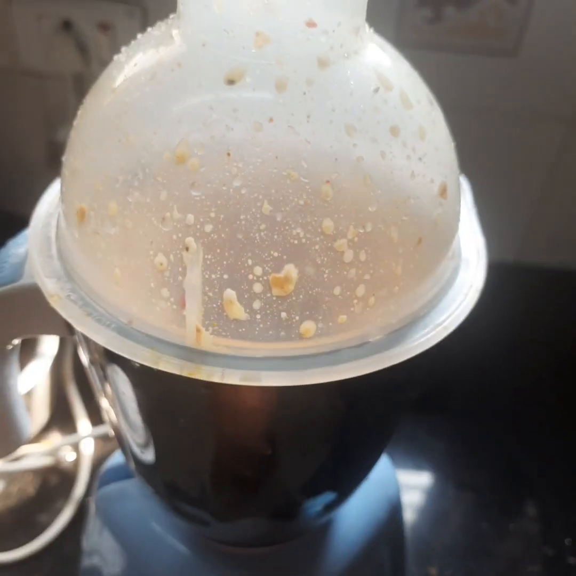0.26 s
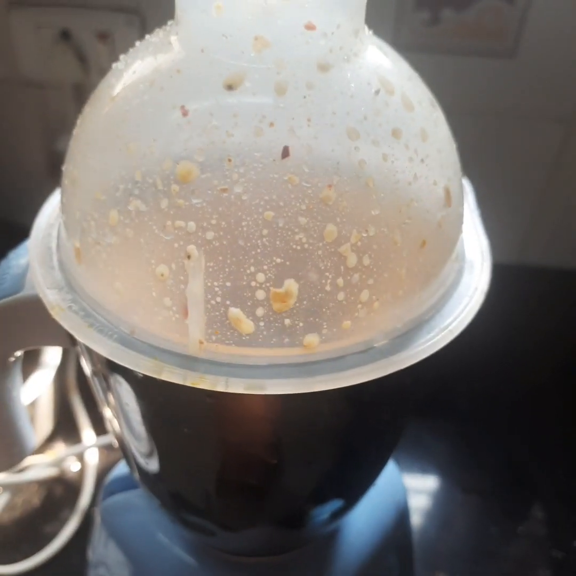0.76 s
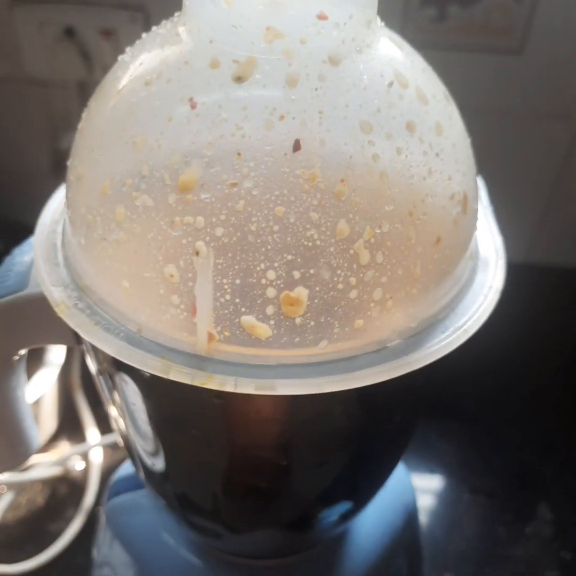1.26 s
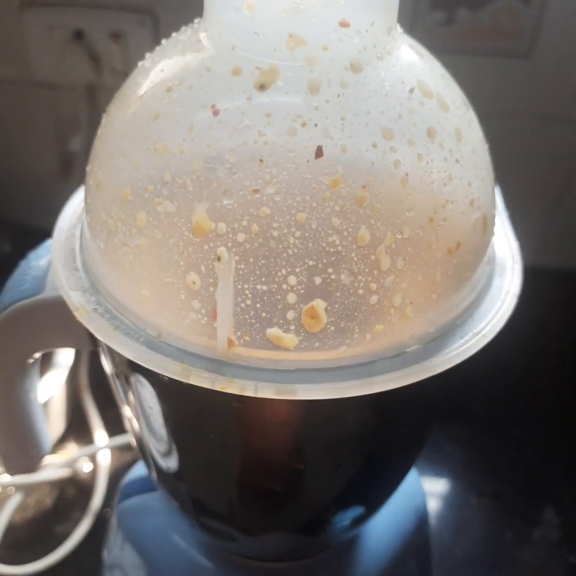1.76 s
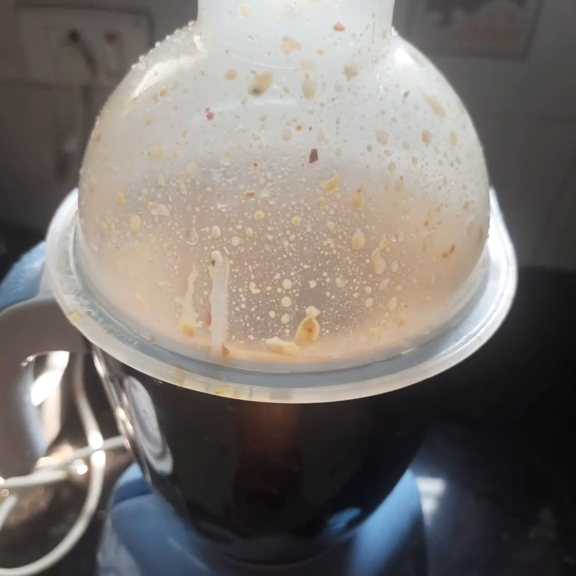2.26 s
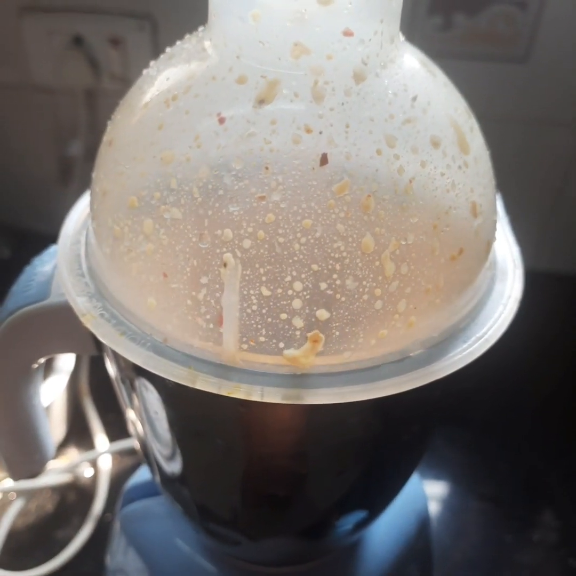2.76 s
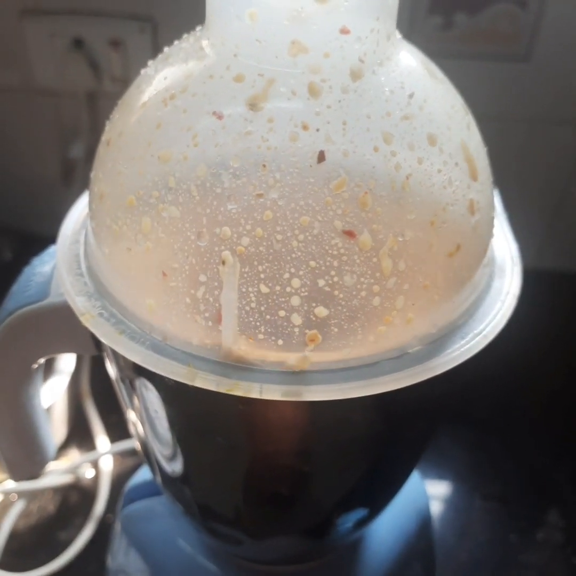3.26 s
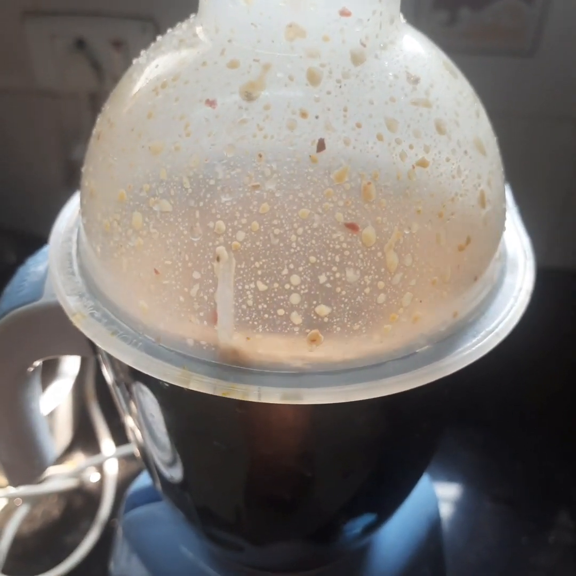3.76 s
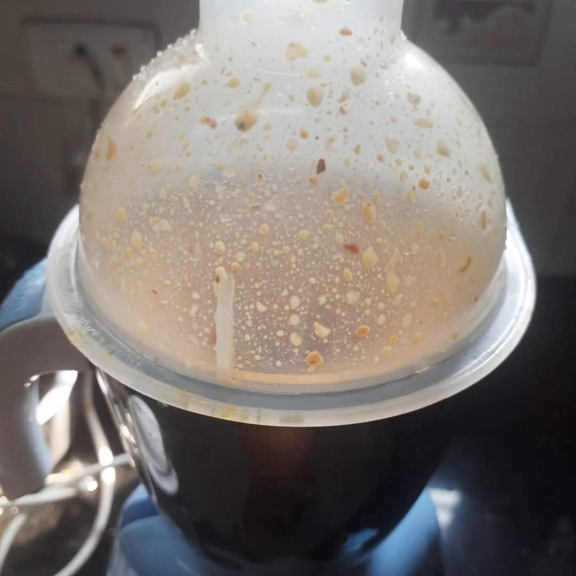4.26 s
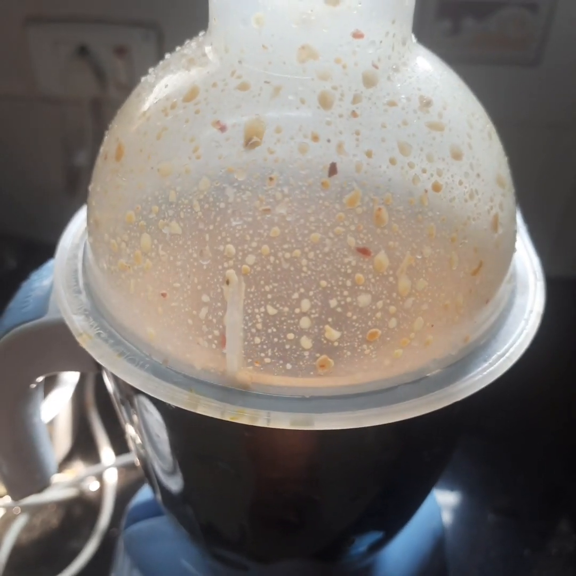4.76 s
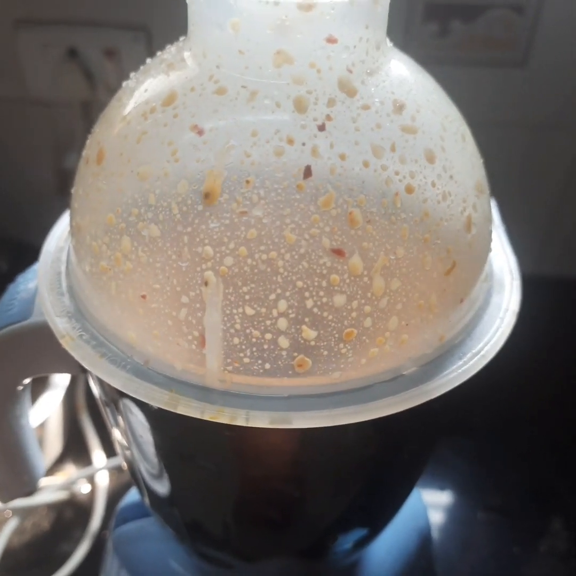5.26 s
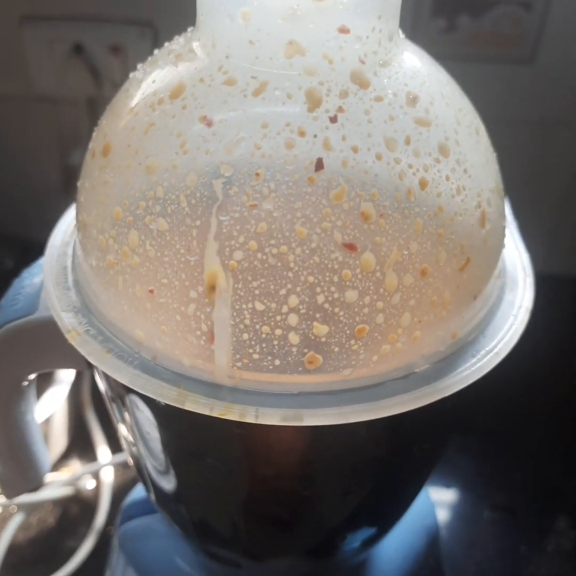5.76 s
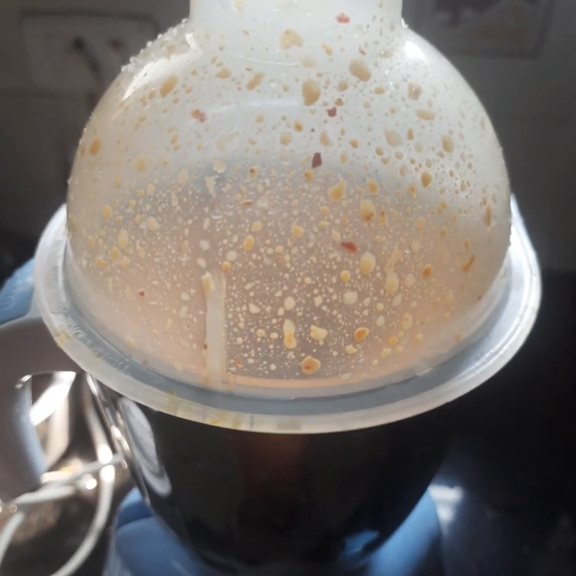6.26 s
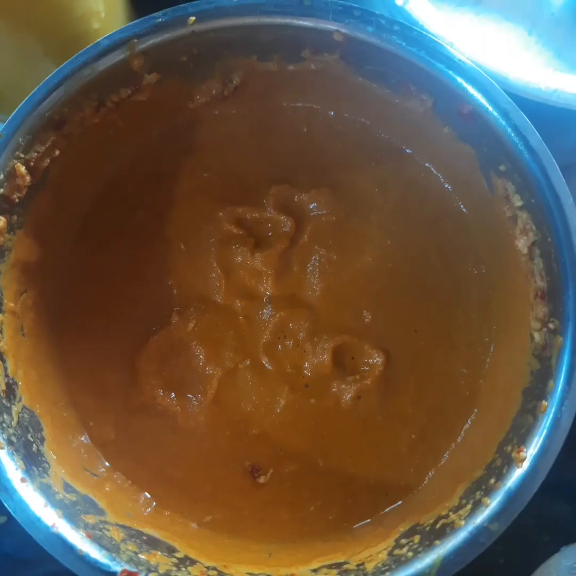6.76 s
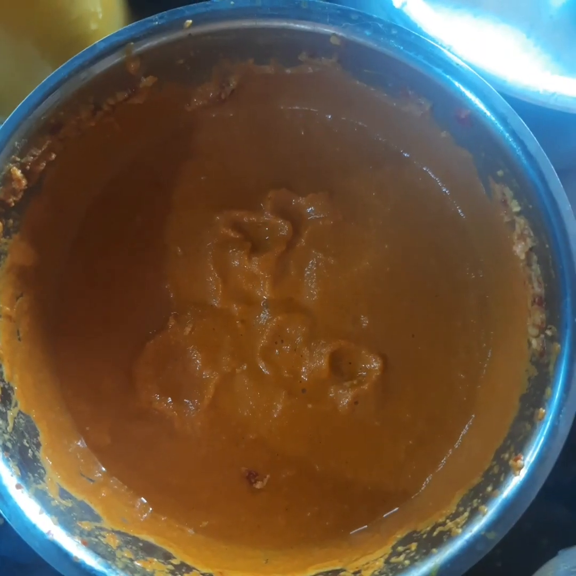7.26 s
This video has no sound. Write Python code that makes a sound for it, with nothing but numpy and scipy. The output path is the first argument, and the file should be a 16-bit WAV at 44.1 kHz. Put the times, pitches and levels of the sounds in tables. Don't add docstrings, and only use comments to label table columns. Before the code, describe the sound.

Close, steady electric grinder drone with metallic ringing, roaring fan and fizzing spray, suddenly replaced after a tiny silence by faint kitchen hum.

```python
import sys
import numpy as np
from scipy import signal
from scipy.io import wavfile
from scipy.ndimage import uniform_filter1d

SR = 44100
rng = np.random.default_rng(int(sys.argv[2]) if len(sys.argv) > 2 else 0)


def linear_from_db(decibels):
    return 10 ** (np.asarray(decibels, float) / 20)


def to_wav(s):
    ch = np.atleast_2d(s).T
    pcm = np.round(np.clip(ch, -1, 1) * 32767)
    wavfile.write(sys.argv[1], SR, pcm.astype(np.int16))


N = 331191
T = np.arange(N) / SR

# time in seconds, turns per second in Hz, hum level in dB,
# hum left minus right in dB.
SHAFT_RUN = [(0.0, 241.2, -15.5, -1), (0.07, 239.3, -16, -3.5), (0.45, 240.7, -16.5, -4),
             (0.54, 241.6, -16, -3), (1.84, 238.8, -16, -4.5), (2.19, 239.1, -16.5, -4.5),
             (3.16, 239.5, -16.5, -4.5), (3.34, 237.4, -17.5, -5), (4.18, 238.2, -17, -4.5),
             (4.4, 236.8, -18.5, -5.5), (4.61, 237.3, -16.5, -4.0), (4.96, 237.7, -17.5, -5.5),
             (5.09, 237.2, -17, -4.5), (6.63, 234.9, -17, -4.5), (6.67, 238, -17, -4.5)]


def shaft_angle():
    speed_hz = column(SHAFT_RUN, count=1) + 0.38 * drift(top_hz=24.84)
    return 2 * np.pi * np.cumsum(speed_hz) / SR


# multiple of the shaft speed, start phase in radians,
# right minus left in dB, left lead in radians.
OVERTONE_PORTS = [(2, 0.31, -5.5, 1.08), (3, 0.81, -6, 1.1), (4, 1, -4, 2.8)]
# best speed
# in Hz, level in dB, dB lost per Hz away from it, waver in dB, share of the jar's tilt taken (no unit).
OVERTONE_MOUNTS = [(232.2, -34, 0.43, 2.73, -0.48), (239.2, -36.5, 1.8, 0.4, 1.1),
                   (237., -32.5, 0.6, 1.3, -.2)]
# time in seconds, tilt in dB,
# half length in seconds.
PASTE_LURCHES = [(0.3, 3, 0.098), (0.67, -3, 0.18), (0.97, 5.5, 0.071), (1.15, -5, 0.044),
                 (1.65, 2.5, 0.17), (1.9, 2.5, 0.065), (2.4, 2, .12), (2.63, -2.5, 0.062), (3.0, 3.5, 0.19),
                 (3.52, 0, 0.071), (3.8, 4, 0.081), (4.5, -1, 0.093), (4.88, 6, .08), (5.05, 0, .06),
                 (5.4, 1.5, 0.11), (5.62, -7, 0.071), (5.92, 0, .07)]
# multiple of the shaft speed, left level in dB, right level in dB,
# left lead in radians.
FAINT_OVERTONES = [(5, -50, -48, -.9), (11, -54, -49, -.7), (12, -53, -49, -.8)]


def hum(angle):
    hum_lead = np.interp(T, [0, 4.5], [0.3, 0.02])
    level = linear_from_db(column(SHAFT_RUN, count=2) + 0.35 * drift(top_hz=30.2) - 0.4)
    turning = np.sqrt(2) * level * np.exp(1j * angle)
    out = ports(turning, column(SHAFT_RUN, count=3), hum_lead)

    tilt_db = swells(PASTE_LURCHES)
    for port, mount in zip(OVERTONE_PORTS, OVERTONE_MOUNTS):
        order, start, right_db, lead = port
        best_hz, top_db, loss_db, waver_db, share = mount
        phase = order * angle + start + 0.34 * drift(top_hz=8.6)
        off_hz = abs(column(SHAFT_RUN, count=1) - best_hz)
        suited_db = top_db - loss_db * off_hz + waver_db * drift(top_hz=5.0)
        left = np.sqrt(2) * linear_from_db(suited_db + share * tilt_db + 1.3 * drift(top_hz=33.97))
        right = left * linear_from_db(right_db + 1.8 * drift(top_hz=6.0))
        out[0] += left * np.cos(phase)
        out[1] += right * np.cos(phase - lead + 0.22 * drift(top_hz=6.5))

    for order, left_db, right_db, lead in FAINT_OVERTONES:
        phase = order * angle + 1.7 * drift(top_hz=12.0)
        z = np.sqrt(2) * linear_from_db(1.7 * drift(top_hz=6.7)) * np.exp(1j * phase)
        out += [linear_from_db(left_db) * (z * np.exp(1j * lead)).real, linear_from_db(right_db) * z.real]
    return out


def churn_lift_db():
    lumpy_db, settling_s, surge_db = 5, 0.12, 0.41
    return lumpy_db * np.exp(-T / settling_s) + surge_db * drift(top_hz=10.0)


# pitch in Hz, width in Hz, level in dB,
# left minus right in dB, left lead in radians.
JAR_TONES = [(397, 150, -48, 6.5, 1.56), (583, 69, -51, 7, 0.2), (939, 75, -40, -3, 1.5),
             (1057, 52, -46.5, 0, -0.5), (1235, 170, -39.5, -3, -2.5), (1355, 140, -43.5, -1, -1),
             (1567, 80, -42, -0.5, -2.5), (1778, 100, -45.5, 7, 0), (1934, 100, -42, -1.5, -2.0),
             (2035, 29.7, -44, 5, -1.5), (2120, 55, -39, -3, -2.5), (2253, 24, -46, -5, 4.5),
             (2395, 43, -44.5, -4, 6.5), (2584, 49, -38.5, -8, 4), (2842, 110, -47.5, -6.5, 0),
             (2976, 123, -42, -2.5, 0.47), (3312, 40, -47.5, -1.5, 1.5), (4100, 220, -53, 5.5, -7),
             (4800, 1000, -45.5, 0, -2.0)]
# time in seconds, peak in dB, loudest pitch in Hz,
# low tones in dB, high tones in dB.
HARD_KNOCKS = [(0.0384, -5, 1750, -2.5, -5), (0.0505, -17.5, 2400, -9.5, -10.5),
               (0.1184, -17.5, 1886, -16, -2), (0.392, -14, 2550, -14, -9), (0.741, -11, 2040, -11, -8),
               (0.7885, -22.5, 2560, -8, -8), (0.9555, -16.5, 2550, -15, -5), (1.109, -17.5, 2040, -3, 0),
               (1.4435, -15, 2970, -13, -17), (1.67, -16.5, 2580, -18, -12), (2.674, -19.5, 2420, -9, -13),
               (3.2464, -7.5, 1880, -10.5, -7), (3.2564, -11.5, 2060, -11, -8),
               (3.3304, -18, 2840, -20, -13), (3.523, -19.5, 2930, -6, 2), (3.5954, -13, 2450, -10, -12),
               (3.9036, -24.5, 2574, -15, -13), (4.5635, -12, 2570, -19, -10)]


def jar(angle):
    churn = linear_from_db(churn_lift_db() + 0.21 * drift(top_hz=41.0)) * (1 + 0.061 * np.cos(angle))
    t = np.arange(1100) / SR
    rise = 1 - np.exp(-t / 0.00043)
    rattle_shape = rise * (np.exp(-t / 0.0016) + 0.41 * np.exp(-t / 0.0094))
    knock_width = 210.0
    out = np.zeros((2, N))
    for hz, width, db, pan_db, lead in JAR_TONES:
        push = rng.standard_normal((2, N)) * linear_from_db(1.1 * drift(top_hz=50.23))
        direct, scattered = ring(push, hz, 1.57 * width)
        size = linear_from_db(db + 3.0) * churn / np.sqrt(np.mean(direct.real ** 2))
        out += size * ports(direct, pan_db, lead)
        out += size * 0.28 * ports(scattered, pan_db, lead + np.pi)

        blows = np.zeros(N)
        rattles = rng.choice([-1.0, 1.0], (len(HARD_KNOCKS), len(t))) * rattle_shape
        for (s, peak_db, near_hz, low_db, high_db), rattle in zip(HARD_KNOCKS, rattles):
            if hz < 1450:
                fit_db = low_db - 18 * (hz < 800)
            elif hz > 3200:
                fit_db = high_db
            else:
                fit_db = -8.0 * abs(np.log2(hz / near_hz))
            blows[round(s * SR):][:len(t)] += linear_from_db(peak_db + fit_db + 16.5) * rattle
        struck_width = max(knock_width, width)
        struck = ring(blows, hz, struck_width) * np.sqrt(knock_width / struck_width)
        out += ports(struck, 0.45 * pan_db, 0.78 * lead)
    return out


# pitch in Hz, level in dB per Hz.
FIZZ_COLOUR = [(2000, -29.5), (3500, -5.5), (4500, -4), (6500, -4.5), (7900, -1.5), (9400, -11),
               (10800, -6.5), (12800, -6), (17000, -5.5)]
# pitch in Hz, level in dB per Hz.
SPLASH_COLOUR = [(3000, -29), (7000, -6.5), (10000, -13.5), (12500, -5.5), (17000, -6)]
# pitch in Hz, left minus right in dB.
SPRAY_SIDES = [(60, -2), (110, 2), (200, -3), (380, -6.5), (700, 0), (1290, -5.5), (2380, 5.5),
               (4400, -4.5), (8120, -0.5), (15000, 4.5)]
# time in seconds, lift in dB, half length in seconds.
SPRAY_GUSTS = [(0.04, 3, .1), (0.66, 2, .12), (1.55, 1.5, .06), (1.68, 4, .03), (1.82, 0.5, .03),
               (2.05, 0.5, .1), (2.63, 0.5, .1), (3.04, 3.5, .03), (3.5, 0.5, .08), (3.75, -2, .08),
               (3.97, 0.5, .05), (4.55, 1.5, .08), (6.4, 1.5, .04), (6.66, 2, .05)]
# time in seconds, peak in dB.
LID_SPLASHES = [(0.182, -26), (0.6205, -28), (0.6724, -23.5), (0.7926, -23), (0.8709, -28), (0.9083, -23),
                (1.2406, -24.5), (1.5853, -18), (1.6686, -25.5), (2.0248, -25), (2.1779, -25),
                (2.2912, -20.5), (2.6319, -24), (2.6923, -21.5), (3.4872, -21), (3.6491, -26),
                (3.8332, -24.5), (3.9674, -22), (4.3989, -23), (4.5087, -20), (4.571, -22.5),
                (4.8526, -21.5), (4.9147, -24.5), (5.2669, -24.5), (5.3218, -23.5), (5.6516, -21),
                (5.7074, -26.5), (6.3904, -20.5), (6.6303, -24), (6.6543, -22.5)]


def spray(angle):
    throb = 1 + 0.06 * np.cos(angle - 2.8) + 0.059 * np.cos(2 * angle + 0.5)
    drops = (rng.random(N) < 90 / SR) * linear_from_db(3.2 * np.minimum(rng.exponential(1, N), 3))
    small = evened(signal.oaconvolve(drops, np.exp(-np.arange(400) / SR / 0.001))[:N])
    level_db, thinning_db_per_s = -35.0, 0.2638
    gust_db = swells(SPRAY_GUSTS) + 0.29 * drift(top_hz=59.0)
    gusts = linear_from_db(level_db + thinning_db_per_s * T + gust_db)
    fizz = noise(FIZZ_COLOUR, [(3000, 0.22), (16000, -0.042)], patchy_db=1.0, pan=SPRAY_SIDES)
    splash = noise(SPLASH_COLOUR, [(3000, 0.13), (16000, -0.19)], patchy_db=-1.0, pan=SPRAY_SIDES)
    cracks = bursts(HARD_KNOCKS, lift_db=-20.5, fade_s=0.0025) * fizz
    large = bursts(LID_SPLASHES, lift_db=3.0, fade_s=0.001) * splash
    return gusts * (throb * fizz + linear_from_db(-7.0) * small * splash) + cracks + large


# pitch in Hz, level in dB per Hz.
ROAR_COLOUR = [(20, -50.5), (60, -41), (150, -32), (200, -27.5), (240, -2.5), (290, -29.5), (340, -18),
               (600, -23), (800, -19), (950, -20.5), (1600, -22.5), (2500, -13.5), (3600, -24.5),
               (9000, -57.5)]
# pitch in Hz, likeness (no unit, 1 = the same).
ROAR_LIKENESS = [(30, 0.97), (80, 0.99), (150, 0.67), (350, .92), (500, 0.52), (800, 0.9), (1500, 0.053),
                 (9000, 0.21)]
# time in seconds, lift of the boom in dB, half length in seconds.
PHONE_BUMPS = [
    (0., 15, 0.085),
    (2.45, 3, 0.092),
    (3.65, 0, .12),
    (4.35, 8.5, 0.28),
    (5.26, 8, .1),
    (5.6, 6, .06),
    (5.95, 2, .12),
    (6.67, 14, 0.11),
]


def wash():
    roar_level = linear_from_db(churn_lift_db() - 30.0 + 0.81 * drift(top_hz=69.6))
    roar = roar_level * noise(ROAR_COLOUR, ROAR_LIKENESS, patchy_db=0.37)
    boom_db, rise_db_per_s, waver_db = -69, 0.9, 3.5
    boom_level = linear_from_db(boom_db + rise_db_per_s * T + swells(PHONE_BUMPS) + waver_db * drift(top_hz=4.9))
    boom = evened(ring(rng.standard_normal(N), 95.0, 25.0).real)
    return roar + boom_level * boom


# pitch in Hz, level in dB per Hz.
ROOM_COLOUR = [(25, -17), (65, -10), (130, -13.5), (250, -8), (420, -15.5), (550, -14), (800, -22.5),
               (1000, -20.5), (1500, -28), (2600, -29.5), (4200, -35), (8500, -42), (9300, -54),
               (15700, -56)]
# pitch in Hz, likeness (no unit, 1 = the same).
ROOM_LIKENESS = [(60, 0.84), (180, 0.98), (550, 0.52), (1650, -0.15), (4970, -0.06), (15000, 0.3)]
# pitch in Hz, width in Hz, level in dB.
APPLIANCE_HUMS = [(62.3, 23, -70.5), (125.4, 33, -67.5), (208, 40, -65), (543, 20, -68)]


def kitchen():
    out = linear_from_db(-59.0) * noise(ROOM_COLOUR, ROOM_LIKENESS, patchy_db=2.5)
    for hz, width, db in APPLIANCE_HUMS:
        out += linear_from_db(db) * evened(ring(rng.standard_normal(N), hz, width).real)
    return out


def evened(x):
    return x / np.sqrt(np.mean(x ** 2) + 1e-20)


def read(points, hz):
    f, value = np.transpose(points)
    return np.interp(np.log(hz + 1), np.log(f + 1), value)


def column(rows, count):
    columns = np.transpose(rows)
    return np.interp(T, columns[0], columns[count])


def drift(top_hz):
    t = T[::128]
    slow = 0
    for f in np.geomspace(top_hz / 20, top_hz, 24):
        slow = slow + np.sin(2 * np.pi * (f * t + rng.random())) / np.sqrt(f)
    return np.interp(T, t, evened(slow))


def swells(events):
    return sum(lift_db * np.exp(-((T - s) / half) ** 2) for s, lift_db, half in events)


def bursts(events, lift_db, fade_s):
    hits = np.zeros(N)
    for s, peak_db, *_ in events:
        hits[round(s * SR)] += linear_from_db(peak_db + lift_db)
    return signal.oaconvolve(hits, np.exp(-np.arange(600) / SR / fade_s))[:N]


def ring(x, hz, width):
    r = np.exp(-np.pi * width / SR)
    pole = [1, -r * np.exp(2j * np.pi * hz / SR)]
    return signal.lfilter([(1 - r) ** 2], np.convolve(pole, pole), x)


def ports(z, pan_db, lead):
    left = linear_from_db(pan_db / 2) * (z * np.exp(1j * lead)).real
    right = linear_from_db(-pan_db / 2) * z.real
    return np.array([left, right])


def noise(spectrum, same, patchy_db, pan=((1, 0), (2, 0))):
    frames, hz = N // 256 + 5, np.fft.rfftfreq(1024, 1 / SR)
    a, b, c, d, patches = rng.standard_normal((frames, 513, 5)).T
    patches = evened(uniform_filter1d(uniform_filter1d(patches, 14, 0), 12, 1))
    like = np.clip(read(same, hz), -1, 1)[:, None]
    left = a + 1j * b
    right = like * left + np.sqrt(1 - like ** 2) * (c + 1j * d)
    z = np.array([left, right])
    z *= linear_from_db(read(spectrum, hz)[:, None] + patchy_db * patches)
    z *= linear_from_db(np.outer([0.5, -0.5], read(pan, hz)))[:, :, None]
    return evened(signal.istft(z, nperseg=1024, noverlap=768)[1][:, :N])


def scene():
    change_s, resume_s = 6.6745, 6.732
    angle = shaft_angle()
    grinder = hum(angle) + jar(angle) + spray(angle) + wash()
    fade_in = np.clip((T - resume_s) * 1500, 0, 1)
    return grinder * (T < change_s) + kitchen() * fade_in


def roll_off(x):
    return signal.sosfilt(signal.butter(12, 15750, fs=SR, output="sos"), x)


def record(dry):
    edge = signal.firwin(401, 15800, window=("kaiser", 9), fs=SR)
    limited = signal.oaconvolve(dry, edge[None], "same", axes=1)
    return roll_off(limited)


dry = scene()
out = record(dry)
to_wav(out)
```